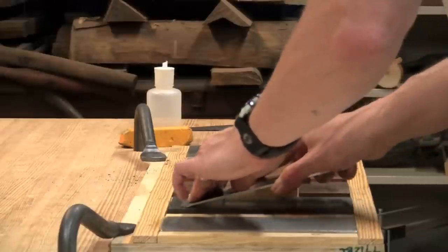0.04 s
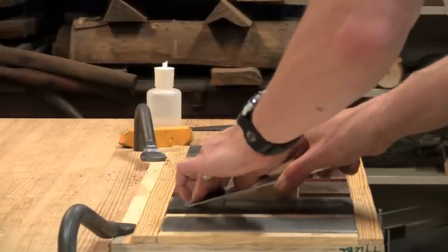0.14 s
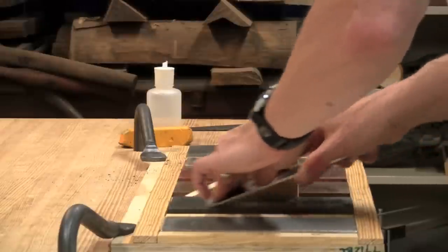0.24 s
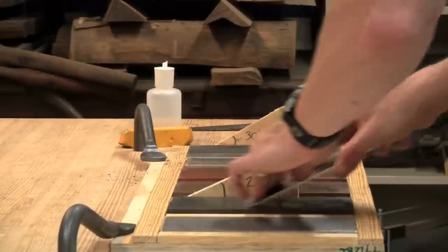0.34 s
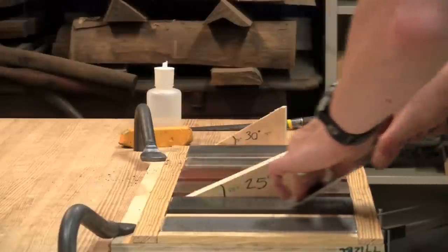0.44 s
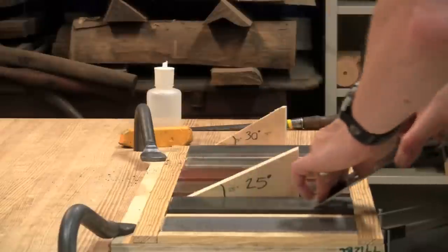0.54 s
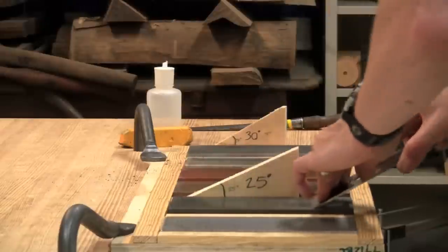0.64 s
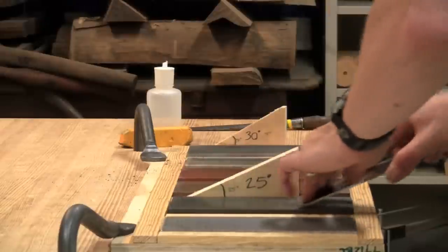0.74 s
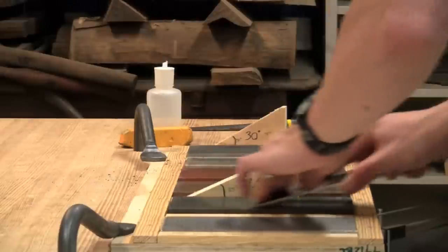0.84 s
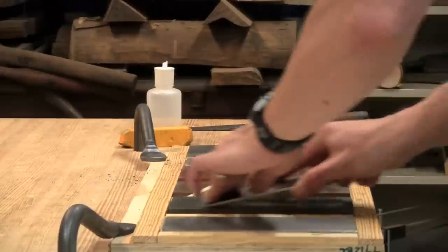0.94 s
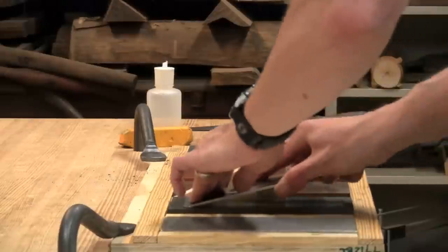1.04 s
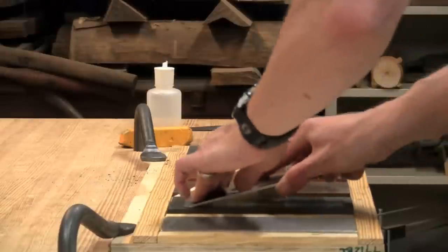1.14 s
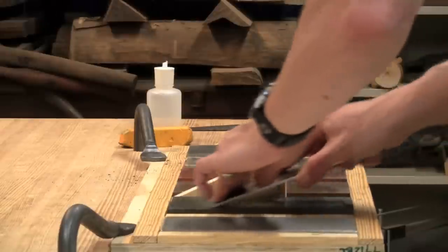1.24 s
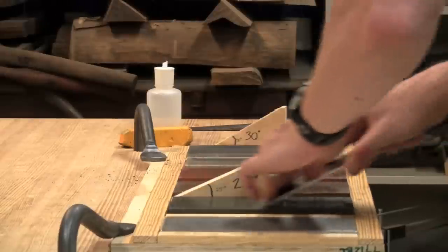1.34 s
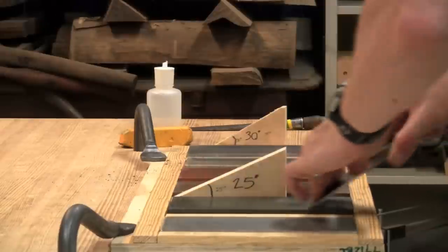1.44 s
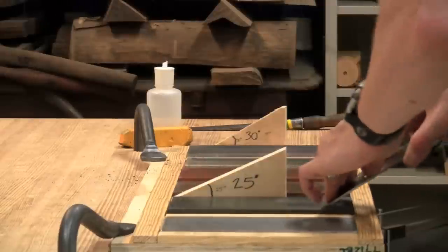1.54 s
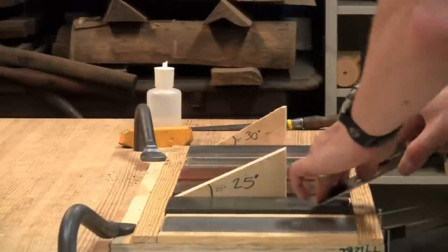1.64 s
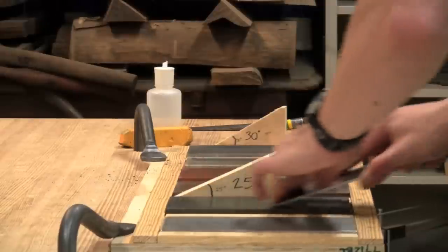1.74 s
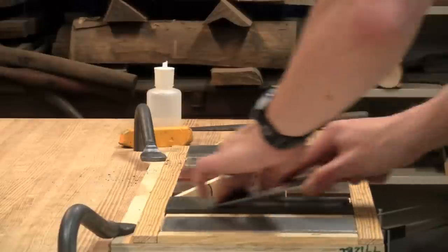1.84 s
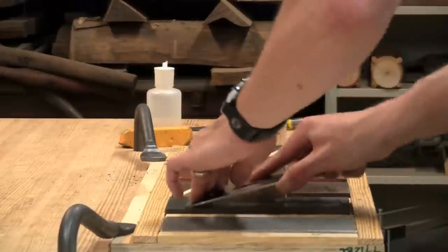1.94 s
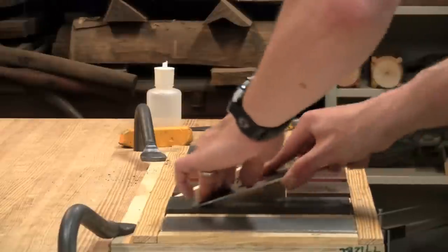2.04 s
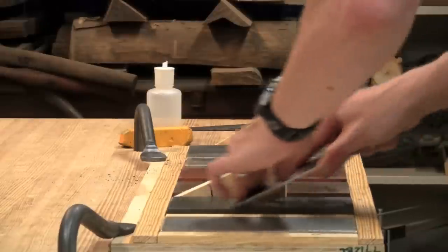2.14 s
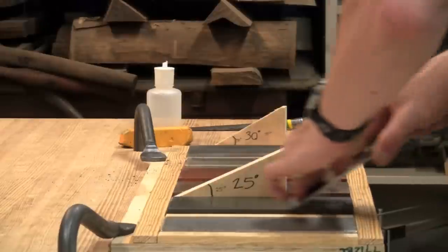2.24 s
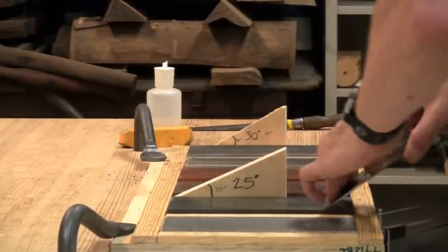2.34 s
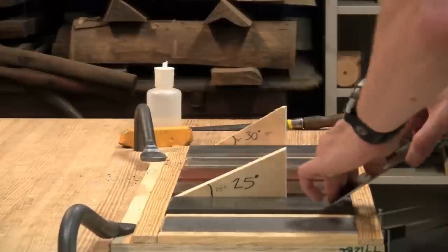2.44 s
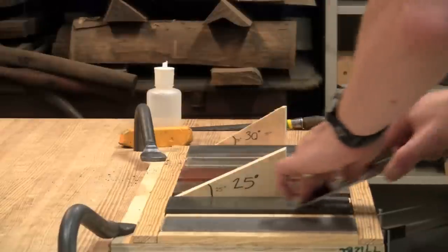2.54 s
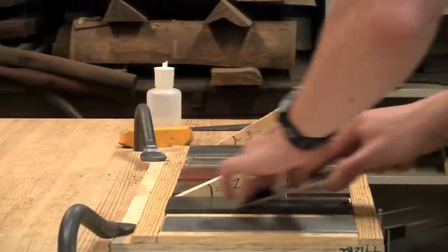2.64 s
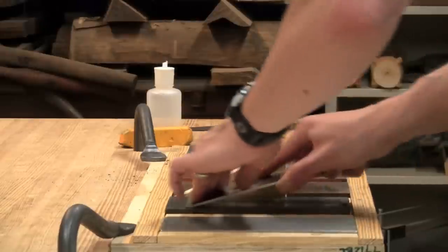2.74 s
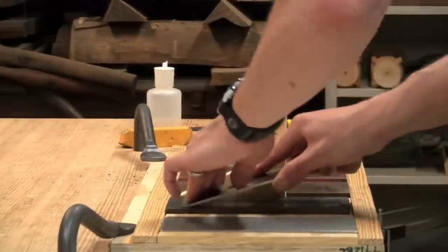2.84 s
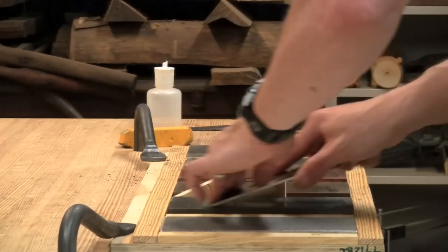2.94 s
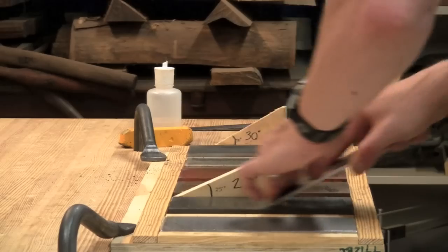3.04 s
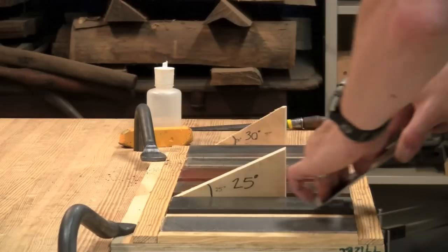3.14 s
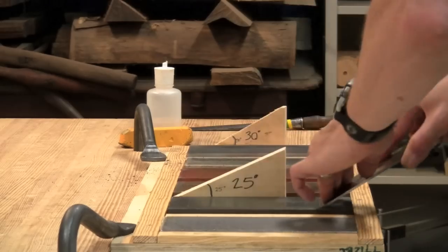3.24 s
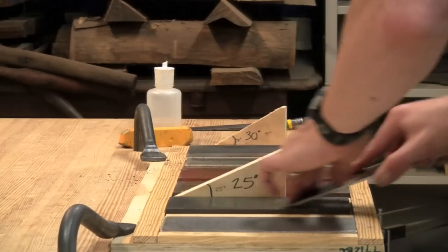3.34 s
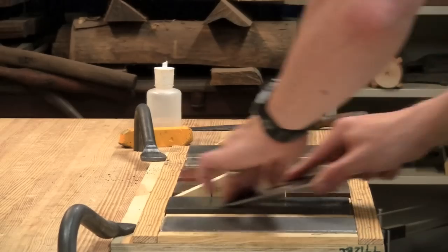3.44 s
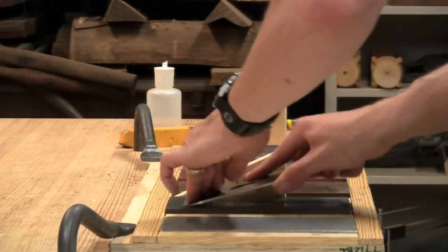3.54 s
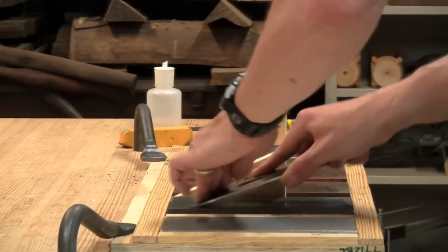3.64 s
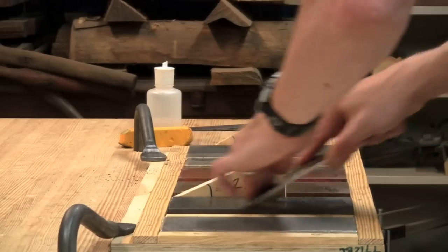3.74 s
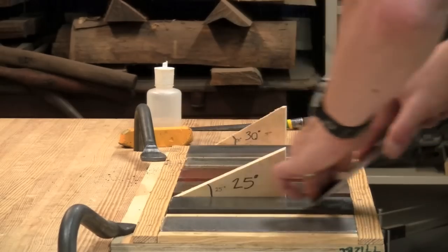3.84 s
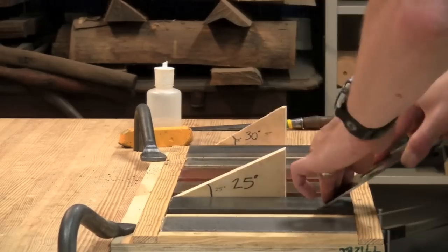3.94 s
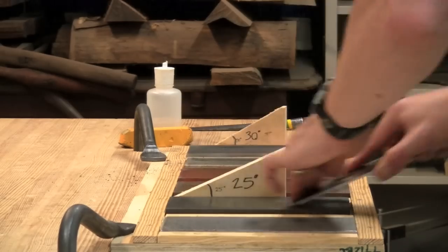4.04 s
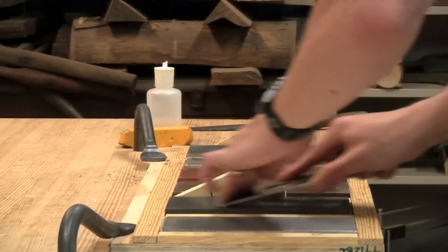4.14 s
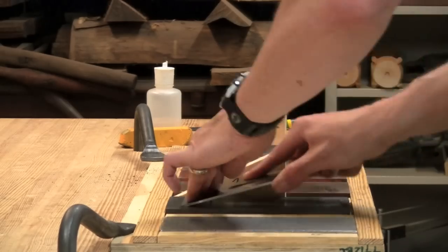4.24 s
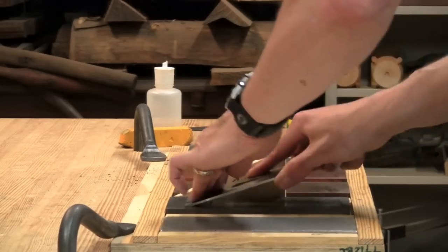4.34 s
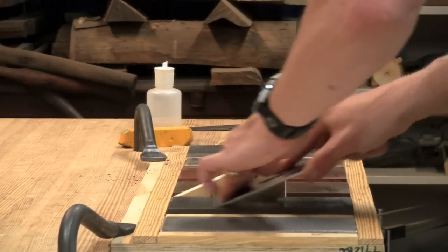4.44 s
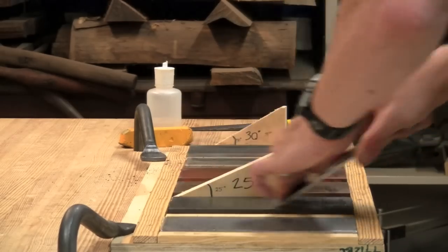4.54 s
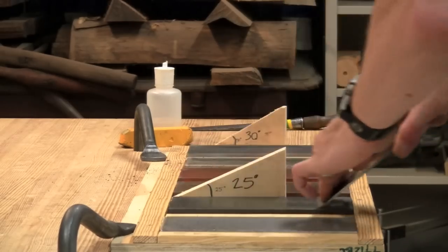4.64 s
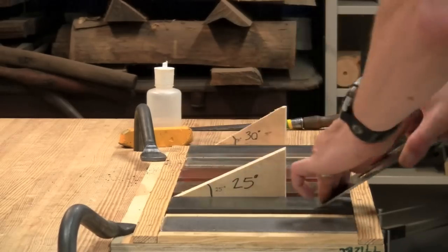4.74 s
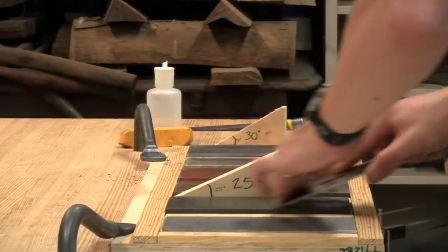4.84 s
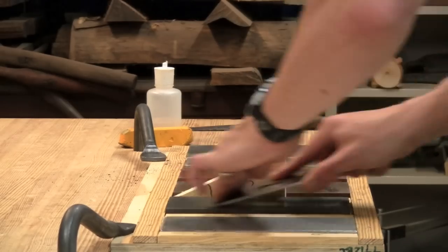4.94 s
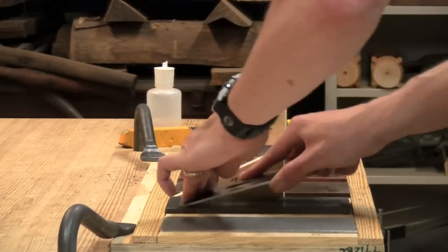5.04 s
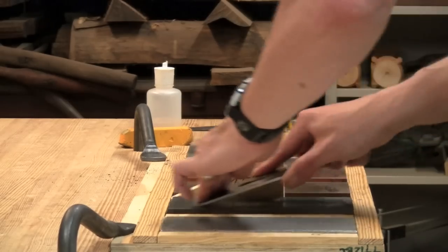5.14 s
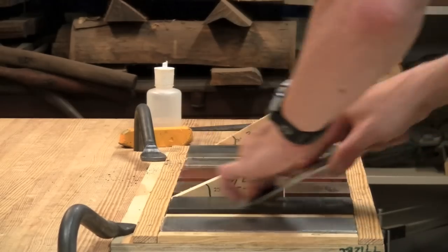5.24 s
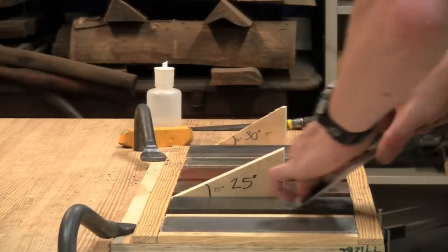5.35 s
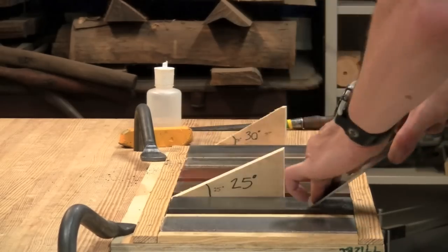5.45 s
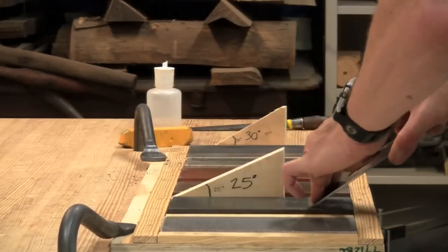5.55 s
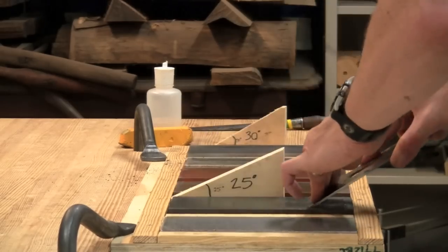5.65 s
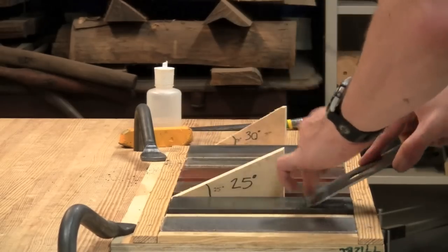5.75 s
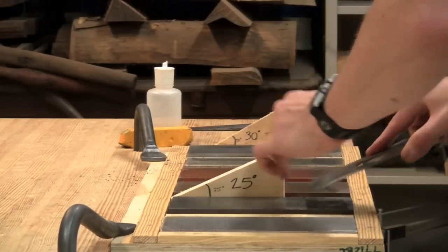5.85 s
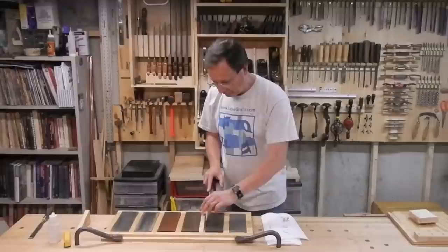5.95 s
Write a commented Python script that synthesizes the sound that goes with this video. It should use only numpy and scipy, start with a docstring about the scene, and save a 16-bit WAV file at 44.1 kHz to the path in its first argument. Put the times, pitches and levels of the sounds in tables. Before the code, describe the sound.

A steel blade rasps back and forth on an abrasive plate in quick strokes, with dull bench thuds at the turns, in a small workshop.

```python
"""A steel blade is honed back and forth on an abrasive plate clamped to a wooden workbench.
Rasp: random grit impacts, coloured and rung through blade and plate resonances, louder with stroke speed.
Noise ticks ring the blade, from handling and the snagging edge; friction sings briefly on one resonance.
Near the turns of later strokes the blade rocks down: a dull push, near echoes and decaying bench modes.
A small workshop answers with decaying noise, over still air and a faint mains hum."""
import sys
import numpy as np
from scipy import signal
from scipy.fft import rfft, irfft, next_fast_len
from scipy.io import wavfile
from scipy.ndimage import uniform_filter1d, map_coordinates

SR = 44100
rng = np.random.default_rng(int(sys.argv[2]) if len(sys.argv) > 2 else 0)


def materialize(psi):
    """Save the field psi as 16-bit PCM at rate SR to the path in sys.argv[1].

    A 1-D psi becomes a single channel; in a 2-D psi each row is a channel.
    """
    bounded = np.clip(np.atleast_2d(psi).T, -1, 1)
    quanta = np.round(bounded * 32767).astype(np.int16)
    wavfile.write(sys.argv[1], SR, quanta)


N = 263936

# Still air, relative spectrum: f/Hz, level/dB
AIR_SPECTRUM = [(15, -49), (25, -10.5), (135, 3), (637, -1.5), (1760, -10), (2850, -11), (6040, -23.5),
                (9770, -20.5), (13500, -37), (15000, -32.5)]
# Mains hum, rises then fades: t/s, level/dB
HUM_LEVEL = [(0, -84), (1.45, -73), (1.65, -76.5), (5.98, -88)]
# Room decay: f/Hz, t60/s
ROOM_T60 = [(150, 0.83), (400, 1), (1200, 1), (3000, 0.99), (12000, 0.26)]
# Colour returned by the soft clutter of the room: f/Hz, level/dB
ROOM_RETURN = [(120, 6), (300, 11), (700, -6), (1500, -11), (2500, -21), (12000, -5.5)]
# Blade landings: t/s, relative level/dB, heaviness/dB
LANDINGS = [(1.726, -14, -1.5), (2.185, -15.5, 4), (2.582, -17.5, -1.5), (3.03, -14, 4), (3.386, -15, -1),
            (3.733, -13, 2), (4.095, -12.5, -2.5), (4.496, -12, 2), (4.876, -11.5, -2.5),
            (5.243, -17.5, 4.5)]
# Bench modes: f/Hz, relative level/dB, t60/s
BENCH_MODES = [(167, -22, 0.16), (193, -7.5, 0.14), (288, -25, 0.3), (337, -23.5, 0.17),
               (365.5, -0.5, 0.16), (414.7, -4.5, 0.21), (478, 4.5, 0.064), (578, -2.5, 0.21),
               (634, -9, 0.16), (693, -15, 0.59), (738, -1, 0.26), (830, -13, 0.2), (883, -8, 0.2),
               (944, -4, 0.14), (1036, -7, 0.15), (1227, -13.5, 0.12), (1432, -12, 0.11)]
# Dull push of the contact, relative spectrum: f/Hz, level/dB
PUSH_SPECTRUM = [(50, -56), (110, -35.5), (150, -27), (200, -5.5), (380, -3), (650, 9.5), (950, -1.5),
                 (1400, -6), (2000, -17), (4000, -57), (9000, -79.5)]
# Thump returned by near surfaces: delay/s, relative gain/1
NEAR_ECHOES = [(0.001, 0.41), (.0045, 0.51), (.0118, 0.94), (0.0188, 0.88), (.025, .5), (.033, .4),
               (.04, 0.54)]
# Heavy landings favour low modes, light ones high modes: f/Hz, tilt/(dB per dB of heaviness)
HEAVINESS_TILT = [(350, 0.48), (650, -0.03), (1000, -.5)]
# Strokes: t_start/s, speeding up/s, braking/s, first bite/dB, fastest/dB, swell arch/1 (1 = straight),
#   brightness/dB, brightness change over stroke/dB, plate drone re rasp/dB; levels relative
STROKE_TABLE = [(0.227, 0.35, 0.15, -53, -37, 2.26, -2, -3, -7.5),
                (.76, .27, 0.15, -57.5, -29.5, 2.06, -2, 0, -3),
                (1.238, .31, 0.13, -46.5, -30.5, 3.7, 1, -2.5, -8),
                (1.725, 0.23, 0.13, -45.5, -28, 1.65, -2.5, 0, -4),
                (2.087, .29, 0.14, -49, -27, 1.96, 2, -2, -6.5),
                (2.58, 0.25, 0.1, -43.5, -30.5, 2.1, 0.5, -2, -4),
                (2.949, .29, 0.09, -44, -28, 2.46, 2.5, 2, -7),
                (3.345, .225, 0.14, -50.5, -27, 1.96, -1, 0, -4),
                (3.733, 0.19, 0.13, -36, -22, 0.81, .5, -0.5, -8.5),
                (4.092, 0.19, .123, -39.5, -27.5, 1.86, -3, -10, -4.5),
                (4.413, 0.3, 0.11, -41, -24.5, 1.43, 2, 1, -8),
                (4.871, 0.19, 0.14, -38.5, -27, 1.14, -2, -8.5, -4.5),
                (5.195, 0.26, 0.12, -44, -31.5, 4.9, 3, 3.5, -7.5),
                (5.74, 0.061, 0.075, -79, -64.5, 1.03, 0, -2, 0.5)]
# Hand pressure, most near the turns: share of stroke/1, plate drone/dB
HAND_PRESSURE = [(0, -0.5), (.25, -0.5), (.45, -2.5), (.65, 0), (.9, 1)]
# Abrasive plate resonances: f/Hz, width/Hz, relative level/dB
PLATE_MODES = [(425, 31, -13), (625, 55, -4), (791.5, 26.4, 3), (896, 20, -2.5), (1039, 44, -6),
               (1156, 83, 0.5), (1334, 175, -3.5), (1517, 72, 0.5), (1636, 83, -3.5)]
# Broad plate response, relative: f/Hz, level/dB
PLATE_BROAD = [(60, -48), (130, -28), (240, -19.5), (500, -13), (1200, -11), (1600, -3.5), (1850, -19),
               (2300, -14.5), (3500, -54)]
# Brief singing of the steel: t_start/s, t_end/s (nominal), f/Hz, width/Hz, level/dB
SING_EVENTS = [(2.959, 3.026, 3500, 400, -50), (4.221, 4.308, 10580, 700, -31.5),
               (4.42, 4.47, 3610, 380, -41.5), (5.201, 5.255, 3580, 380, -46)]
# Short ticks from handling and from the edge snagging: t/s, relative level/dB
EXTRA_TICKS = [(.099, -46), (.109, -45), (.1845, -57), (0.2738, -24), (.346, -22), (0.834, -21.5),
               (1.251, -25.5), (2.972, -29), (3.9434, -16.5)]
# Grit on steel, relative spectrum: f/Hz, level/dB
RASP_SPECTRUM = [(1120, -49), (1900, -17.5), (2210, -2), (2330, 0), (3130, -8), (3830, 1), (4220, -9.5),
                 (4780, -4), (6000, -8.5), (7150, -1.5), (7670, -2.5), (11100, -1.5), (14400, -22),
                 (14900, -59), (15500, -61.5)]
# Hand-damped blade resonances: f/Hz, width/Hz, relative level/dB
BLADE_MODES = [(2280, 203, -1.5), (2447, 41, 3), (2595, 82, 1.5), (2978, 130, -3), (3356, 42, 3),
               (3520, 66, -4), (3770, 89, -1), (4700, 120, -6.5), (5100, 190, -9), (5546, 49, -3),
               (6200, 52, -11.5), (7140, 67, 2.5), (9080, 98, -3), (11050, 490, -19)]
# Colour of the side signal's rasp: f/Hz, level/dB
SIDE_COLOUR = [(100, 7), (600, 4.5), (1200, -15.5), (2400, -50), (3300, -35), (4500, -12.5), (7000, -8.5),
               (12000, -3)]
# Blade slightly to the right: f/Hz, left minus right/dB
STEREO_LEAN = [(100, -2), (300, -1.5), (600, -4), (1200, -0.5), (2800, -1.3), (5500, -0.1), (9000, -2),
               (13000, -1)]

HUM_HZ = 120
HEAVY_RING = 0.91  # bench ring, dB per dB of heaviness
DETUNE, MODE_SCATTER_DB = .008, 2  # each landing hits another spot: relative f spread, level spread
BITE_S = .005  # edge grips this fast
BRAKE_DB, BRAKE_CURVE = 29.5, 2.08  # rasp fall while braking, gentle at first
SLIDE_DB, SLIDE_DB_PER_S = -11.5, 219  # light slide before the bite: level re bite, growth
CATCH_DB = 13  # opening snag re first bite
TICK_T60_S = 0.011
WANDER_DB, WANDER_RATE_HZ = 2.1, 11  # unsteady hand: brightness shift, knot rate
RING_GROWS = 0.15  # extra blade ring, dB per dB of stroke level
GRIP_DRIFT, GRIP_RATE_HZ = .012, 4  # grip retunes the steel: relative scale, knot rate
TOP_HZ = 15200


def amp(db):
    """Decibels to gain."""
    return 10 ** (np.asarray(db) / 20)


def unit(x):
    """Scale to rms 1."""
    return x / np.sqrt(np.mean(x ** 2) + 1e-20)


def along(points, hz):
    """Interpolate (f/Hz, value) points on a log frequency axis."""
    f, v = np.transpose(points)
    return np.interp(np.log(hz + 1), np.log(f + 1), v)


def curves(rows):
    """One value per sample for each column after t/s."""
    s, *cols = np.transpose(np.squeeze(rows))
    return [np.interp(np.arange(N) / SR, s, c) for c in cols]


def wobble(rate_hz):
    """Smooth random curve, rate_hz knots a second."""
    knots = rng.standard_normal(int(N * rate_hz / SR) + 4)
    return map_coordinates(knots, [np.arange(N) * rate_hz / SR])


def filtered(x, response):
    """Apply a complex frequency response."""
    m = next_fast_len(N + SR // 4)
    return irfft(rfft(x, m) * response(np.fft.rfftfreq(m, 1 / SR)), m)[..., :N]


def coloured(x, spectrum):
    """Apply a (f/Hz, level/dB) colour."""
    return filtered(x, lambda hz: amp(along(spectrum, hz)))


def resonate(x, modes):
    """Sum of band-pass resonances, alternating in sign."""
    def response(f):
        total = 0
        for k, (centre, width, db) in enumerate(modes):
            damping = 1j * f * width
            total = total + (-1) ** k * amp(db) * damping / (centre * centre - f * f + damping)
        return total
    return filtered(x, response)


def pulse(spectrum, size=4096):
    """Causal minimum-phase pulse of a (f/Hz, level/dB) spectrum, peak 1."""
    cepstrum = irfft(np.log(amp(along(spectrum, np.fft.rfftfreq(size, 1 / SR)))))
    cepstrum[1:size // 2] *= 2
    cepstrum[size // 2 + 1:] = 0
    shape = irfft(np.exp(rfft(cepstrum)))
    return shape / np.abs(shape).max()


def add(track, s, sound):
    """Mix a sound into a track at s seconds."""
    start = max(round(s * SR), 0)
    track[start:start + len(sound)] += sound[:len(track) - start]


def shifting(x, depth_db, size=2048):
    """Travelling contact changes the ring: narrow bands swell and fade."""
    z = signal.stft(x, nperseg=size)[2]
    field = rng.standard_normal(z.shape)
    for axis in (0, 1):
        field = uniform_filter1d(field, size=4, axis=axis)
    return unit(signal.istft(z * amp(depth_db * unit(field)), nperseg=size)[1][:N])


def room_tone():
    """Still air as stereo coloured noise, plus a faint wavering mains hum."""
    air_mid, air_side = unit(coloured(rng.standard_normal((2, N)), AIR_SPECTRUM))
    hum_db, = curves(HUM_LEVEL)
    hum = unit(np.sin(2 * np.pi * HUM_HZ * np.arange(N) / SR)) * amp(hum_db + wobble(4.3))
    return amp(-71.5) * (air_mid + np.array([[.8], [-.8]]) * air_side) + hum


def workshop(x):
    """Room answer: noise tail, each frequency dying at its own rate."""
    hz, t, z = signal.stft(rng.standard_normal(SR), SR, nperseg=256)
    decay = amp(-60 * t / along(ROOM_T60, hz)[:, None])
    tail = signal.istft(z * decay, SR, nperseg=256)[1]
    delayed = np.pad(x, (400, 0))  # samples
    answer = signal.fftconvolve(delayed, tail / np.linalg.norm(tail))[:N]
    return coloured(answer, ROOM_RETURN)


def thumps():
    """Blade landings: a dull push, its near echoes and decaying bench modes."""
    out, t = np.zeros(N), np.arange(SR // 2) / SR
    for s, db, heavy_db in LANDINGS:
        def tilt_db(hz):
            return heavy_db * along(HEAVINESS_TILT, hz)

        ring_db = HEAVY_RING * heavy_db - 13
        push = pulse([(hz, level + tilt_db(hz)) for hz, level in PUSH_SPECTRUM])
        for delay, gain in NEAR_ECHOES:
            add(out, s + delay, amp(db - 5 + 0.47 * rng.standard_normal()) * gain * push)
        for hz, level, t60 in BENCH_MODES:
            build = 1 - np.exp(-(t * hz / 3.25) ** 2)  # a few cycles to build up
            mode_hz = hz * (1 + DETUNE * rng.standard_normal())
            tone = np.sin(2 * np.pi * (mode_hz * t + rng.random()))
            mode = build * amp(-60 * t / t60) * tone
            mode_db = db + ring_db + level + tilt_db(hz) + MODE_SCATTER_DB * rng.standard_normal()
            add(out, s, amp(mode_db) * mode)
    return out


def strokes():
    """Slide, bite, swell with speed and brake: level, brightness and plate drone in dB."""
    t = np.linspace(0, N / SR, 4000)
    columns = np.transpose(STROKE_TABLE)[:, :, None]
    start, rise, brake, bite_db, peak_db, arch, bright_db, drift_db, drone_db = columns
    age = t - start
    slide_db = SLIDE_DB * np.clip(1 - age / BITE_S, 0, 1) + SLIDE_DB_PER_S * np.minimum(age, 0)
    swell_db = (bite_db - peak_db) * np.clip(1 - age / rise, 0, 1) ** np.abs(arch)
    braking_db = BRAKE_DB * np.clip((age - rise) / brake, 0, None) ** BRAKE_CURVE
    power = amp(peak_db + slide_db + swell_db - braking_db) ** 2 + 1e-14
    travel = np.clip(age / (rise + brake), 0, 1)
    pressure_db = np.interp(travel, *np.transpose(HAND_PRESSURE))

    def blend(db):
        return np.average(db, axis=0, weights=power)

    level_db = 10 * np.log10(power.sum(axis=0))
    bright_db = blend(bright_db + drift_db * (travel - .5))
    return curves(np.transpose([t, level_db, bright_db, blend(drone_db + pressure_db)]))


def grit(rate_hz, spread_db, judder_db):
    """Countless tiny impacts of random size, clumped by the judder of the hand."""
    sizes = rng.standard_normal(N) * amp(spread_db * rng.standard_normal(N))
    struck = rng.random(N) < rate_hz / SR
    return unit(sizes * struck * amp(judder_db * wobble(170)))


def drone():
    """Bearing down on the grit drives the plate and the board beneath it."""
    level_db, _, drone_db = strokes()
    scratches = grit(rate_hz=6000, spread_db=3.0, judder_db=-0.4)
    ring_colour = [(200, 2.5), (500, 4), (1600, -1.0), (1900, -9.5), (4000, -34)]
    ring = coloured(resonate(scratches, PLATE_MODES), ring_colour)
    broad = coloured(rng.standard_normal(N), PLATE_BROAD)
    return amp(level_db + drone_db - 1.54) * shifting(ring + broad, depth_db=2.5)


def sings():
    """Friction locks briefly and unevenly onto one resonance: narrow-band noise."""
    out, t = np.zeros(N), np.arange(SR // 4) / SR
    for start, end, hz, width, db in SING_EVENTS:
        hold_s = max(end - start, .03)
        swell = np.interp(t, [0, .03, hold_s, hold_s + 0.025], [0, 1, 1, 0])
        band = 1 / (1 + (2 * (np.fft.rfftfreq(len(t), 1 / SR) - hz) / width) ** 4)
        tone = unit(irfft(rfft(rng.standard_normal(len(t))) * band, len(t)))
        add(out, start - .015, amp(db) * swell * tone)
    return out


def ticks():
    """Snags at stroke starts and extra ticks: a noise crack and a short blade ring."""
    cracks, t = np.zeros(N), np.arange(SR // 20) / SR
    openings = [(s, bite_db + CATCH_DB) for s, _, _, bite_db, *_ in STROKE_TABLE]
    for s, db in openings + EXTRA_TICKS:
        add(cracks, s, amp(db - 60 * t / TICK_T60_S) * rng.standard_normal(len(t)))
    return amp(-9.5) * coloured(cracks, RASP_SPECTRUM) + resonate(cracks, BLADE_MODES)


def retuned(x):
    """Changing grip slides all steel resonances slightly up and down, by time warping."""
    position = np.arange(N) + np.cumsum(GRIP_DRIFT * wobble(GRIP_RATE_HZ))
    return map_coordinates(x, [position], mode="mirror")


def rasp():
    """Grit scratches the bevel and rings the blade; the bevel angle tilts the colour."""
    level_db, bright_db, _ = strokes()
    bright_db = bright_db + WANDER_DB * wobble(WANDER_RATE_HZ)
    scratches = grit(rate_hz=16000, spread_db=2, judder_db=0.0)
    ring = unit(retuned(resonate(grit(rate_hz=9000, spread_db=3.0, judder_db=2.0), BLADE_MODES)))
    ring_db = -5.5 + RING_GROWS * np.clip(level_db + 24, -10, 10)
    steel = unit(coloured(scratches, RASP_SPECTRUM)) + amp(ring_db) * ring
    steel = shifting(steel, depth_db=3.5)
    treble = coloured(steel, [(4500, -34.5), (6500, -2.0)])
    tilted = amp(bright_db / 2) * treble + amp(-bright_db / 2) * (steel - treble)
    return amp(level_db + 0.41 * wobble(45) - 0.5) * tilted


def steel_sound():
    """Rasp, ticks and singing of the blade, drawn afresh on each call."""
    return rasp() + ticks() + sings()


def scene():
    """Blade and bench in the workshop; separately drawn steel and room tail form the side."""
    scrape, knock = steel_sound() + drone(), thumps()
    into_room = amp(-15.5) * scrape + amp(-28.5) * knock
    mid = scrape + knock + workshop(into_room)
    side = coloured(steel_sound(), SIDE_COLOUR) + amp(2.0) * workshop(into_room)
    halves = np.array([[.5], [-.5]])  # lean split over left and right
    pair = np.array([mid + side, mid - side])
    return filtered(pair, lambda hz: amp(halves * along(STEREO_LEAN, hz))) + room_tone()


def record(dry):
    """Steep zero-phase low-pass at the band limit."""
    return filtered(dry, lambda hz: 1 / (1 + (hz / TOP_HZ) ** 120))


dry = scene()
out = record(dry)
materialize(out)
```